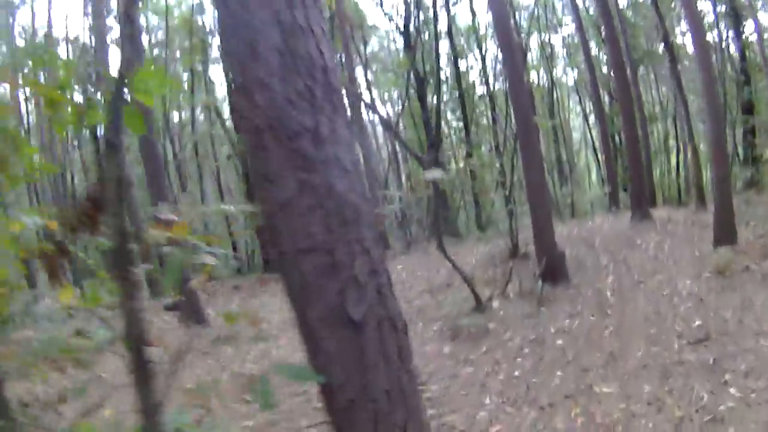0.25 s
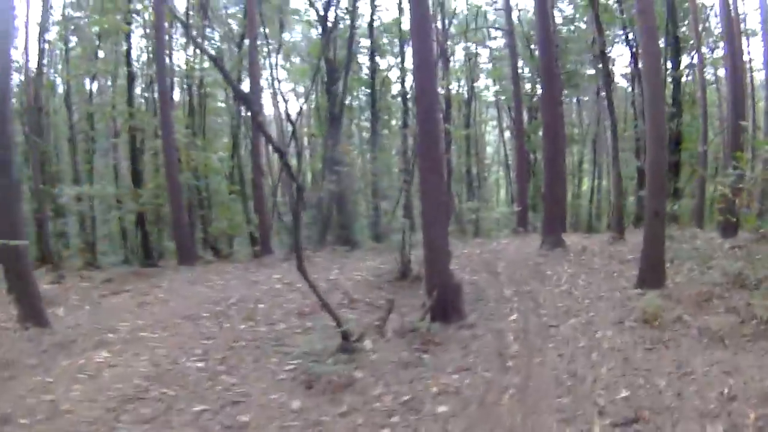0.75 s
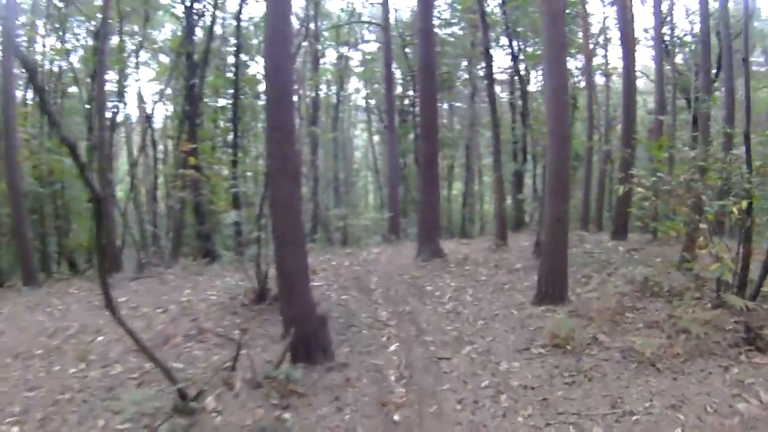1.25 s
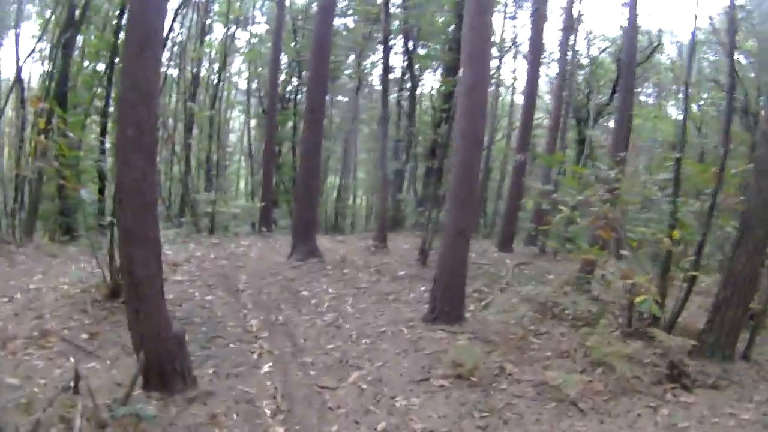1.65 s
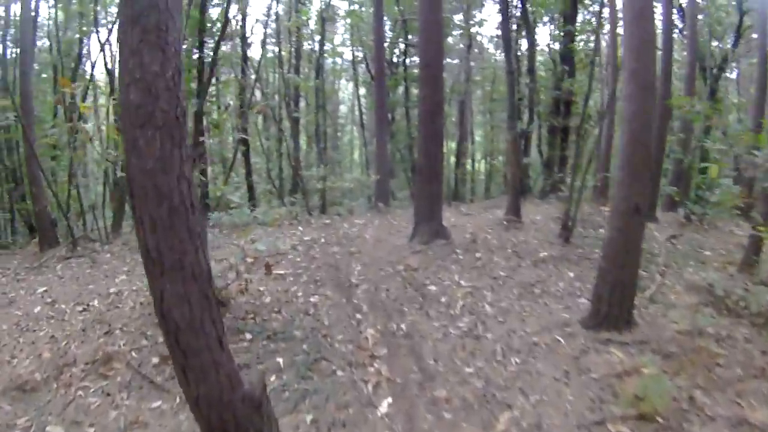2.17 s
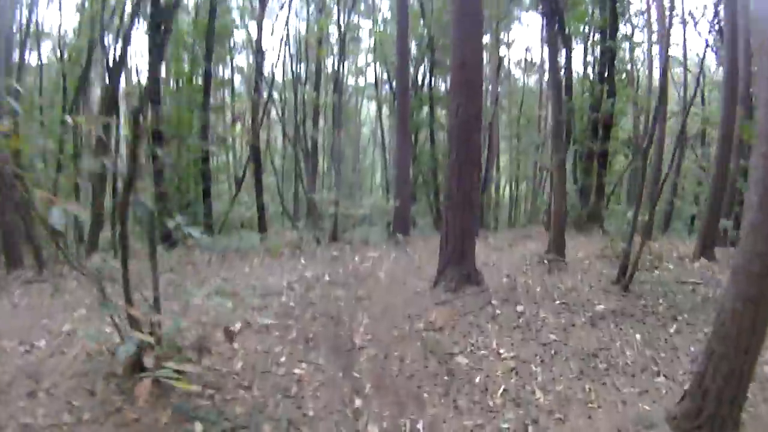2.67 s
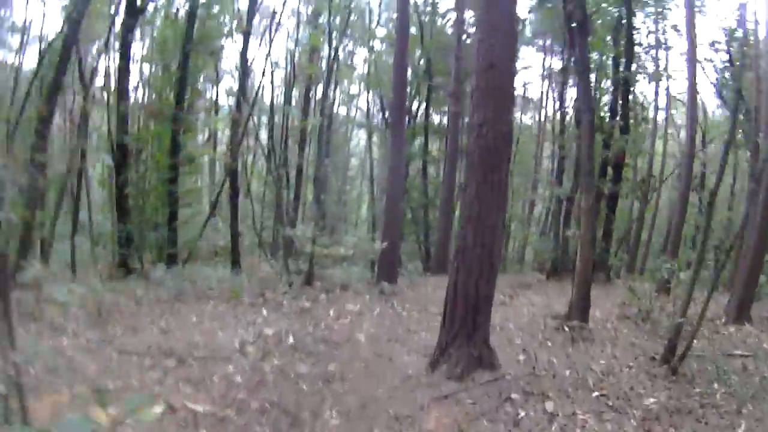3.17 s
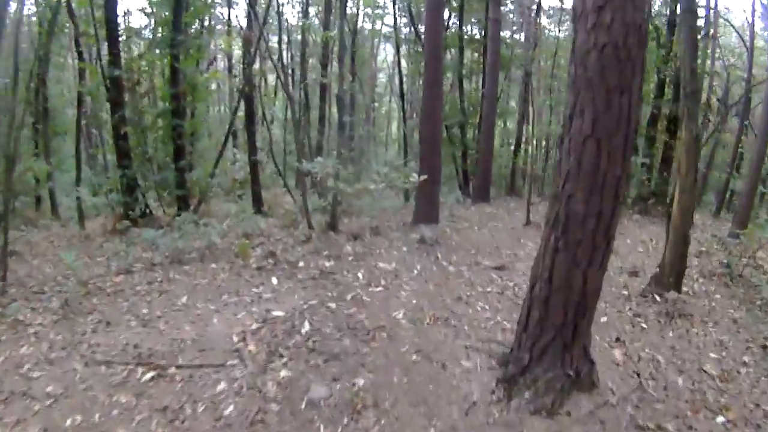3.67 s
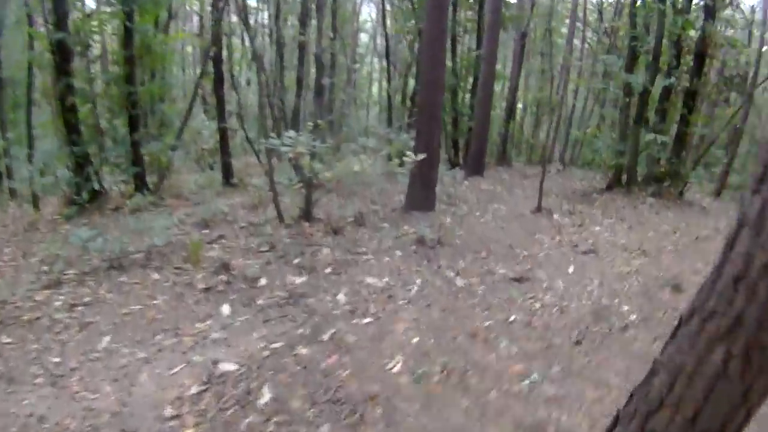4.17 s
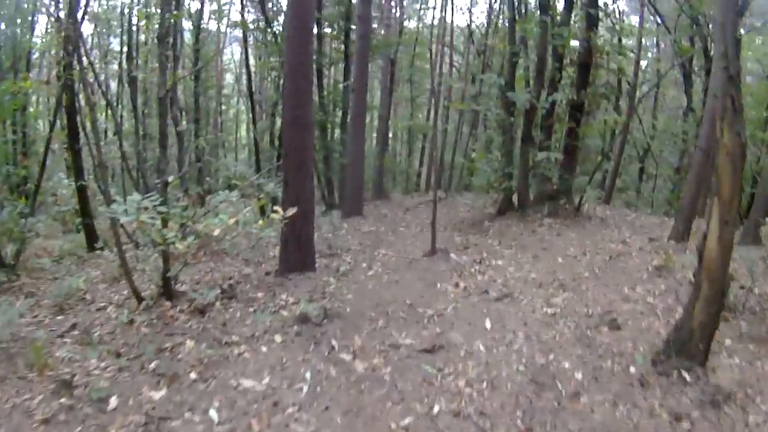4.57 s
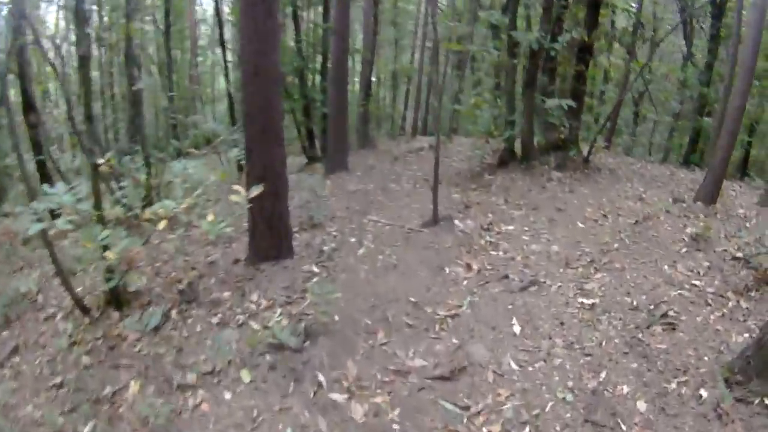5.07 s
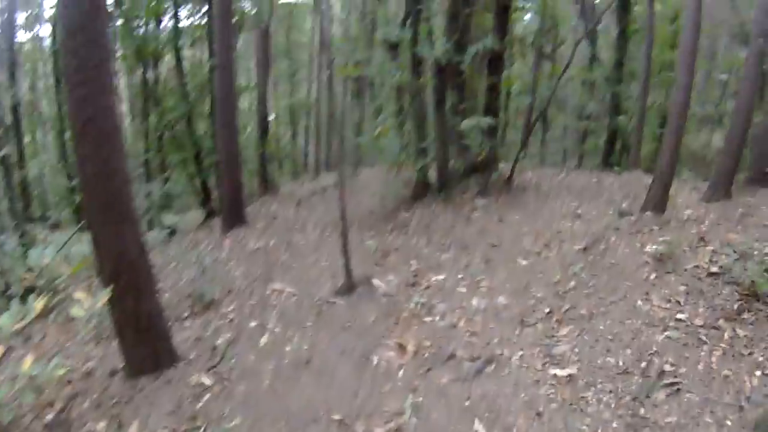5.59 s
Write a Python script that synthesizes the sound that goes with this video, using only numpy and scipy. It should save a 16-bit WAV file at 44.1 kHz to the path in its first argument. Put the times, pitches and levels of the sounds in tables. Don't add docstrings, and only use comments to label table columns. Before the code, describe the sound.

A bike rolls down a leafy forest trail, heard muffled inside a sealed helmet camera case, with low rumble, leaf crunch, ticks and snapping twigs.

```python
import sys
import numpy as np
from scipy import signal
from scipy.fft import rfft, irfft
from scipy.io import wavfile
from scipy.ndimage import uniform_filter1d

SR = 44100
rng = np.random.default_rng(int(sys.argv[2]) if len(sys.argv) > 2 else 0)


def transcribe(signal):
    frames = np.atleast_2d(signal).T
    limited = np.clip(frames, -1, 1)
    pcm = np.round(limited * 32767).astype(np.int16)
    wavfile.write(sys.argv[1], SR, pcm)


def volts_from_decibels(level):
    exponent = np.asarray(level, float) / 20
    return 10 ** exponent


N = 257358
TIME = np.arange(N) / SR

# (time [s], shaking [dB], leaf litter [dB], dryness of the leaves [dB])
TRAIL = [(0, -37.5, -57.5, -1), (.35, -23.5, -60.5, -0.5), (.62, -37.5, -63, -3.5), (.95, -31.5, -60, 1),
         (1.28, -37.5, -64, -3.5), (1.6, -47, -60.5, -2), (1.82, -34, -62, -7), (2.05, -40.5, -66.5, 0.5),
         (2.4, -36.5, -63, 2.5), (2.8, -32.5, -59.5, 4), (3.15, -36, -57.5, 7), (3.5, -33.5, -62.5, -2),
         (3.74, -41, -66, -2.5), (4.2, -36, -62.5, 3.5), (4.7, -32.5, -64, 2.5), (5.05, -40, -62, -2),
         (5.44, -30, -62, -6.5), (5.84, -27.5, -59, 0)]
# (time [s], extra shaking [dB], extra crush [dB], length [s])
JOLTS = [(0.097, 16.5, 4.5, 0.03), (0.28, 5.5, 3.5, 0.021), (.2, -2.5, 2, 0.026), (0.476, 3, 6.5, 0.11),
         (0.527, 5, -1.5, 0.038), (0.705, 13.5, 6.5, .05), (2.08, -8, -2, .04), (2.207, 1, 2, 0.055),
         (2.55, -8, 1, .04), (2.325, 10.5, 5, 0.038), (2.945, 8.5, 1, 0.065), (3.091, 12.5, 4, 0.061),
         (3.33, 5, 0.5, 0.041), (3.6, 8, 0, 0.029), (3.819, 13.5, 10, 0.042), (3.894, 2, 5.5, 0.026),
         (3.973, 21, 5, 0.053), (4.082, 8, 3, 0.034), (4.266, -13, 7, 0.016), (4.344, 10.5, -1, 0.031),
         (4.467, 11, 6.5, 0.057), (4.547, -0.5, 4.5, 0.015), (4.85, 1, 3.5, 0.024), (4.914, 9.5, 3, 0.048),
         (5.136, 9.5, 10, 0.027), (5.198, 10, 12.5, 0.024), (5.267, 12.5, 13, .04),
         (5.556, 5.5, 5.5, 0.037), (5.672, 4.5, 9.5, 0.018), (5.727, 10, 5, 0.034)]
# (frequency [Hz], level [dB])
HEAVE_COLOUR = [(1, -22.5), (3, 14.5), (16, 12), (24, 9.5), (32, -13), (45, -63), (300, -110)]
# (frequency [Hz], level [dB])
FLUTTER_COLOUR = [(18, -26), (28, 2), (40, -4.5), (54, -12.5), (80, -19.5), (108, -31), (150, -53),
                  (300, -100)]
# (frequency [Hz], level [dB])
DRONE_COLOUR = [(70, -10), (110, -3), (155, -5.5), (235, -1.5), (270, -6), (480, -13), (900, -21),
                (1600, -50)]
# (frequency [Hz], level [dB])
LEAF_COLOUR = [(400, -1), (700, -15.5), (1300, -2), (2000, -10.5), (3000, -7), (4500, -10.5), (5600, -25),
               (7000, -37), (10000, -73)]
# (frequency [Hz], width [Hz], level [dB])
CASE_RESONANCES = [(897, 253, -5.5), (1850, 213, -1.5), (2136, 190, -4), (2683, 185, 0.5), (3360, 560, -8),
                   (4250, 560, -13), (4440, 210, -21), (5100, 230, -20.5)]
# (time [s], peak [dB], ring [Hz], decay [s], knock [dB])
BUMPS = [(.044, -36, 65, 0.16, -7), (.12, -51, 67, .1, 12), (.21, -54.5, 67, .1, 8), (.46, -53, 67, .1, 6),
         (2.8, -56, 67, .1, 9), (.686, -40, 64.6, 0.14, -21), (1.354, -43, 93, 0.09, -1.5),
         (1.419, -31, 70, 0.21, -12.5), (1.661, -33.5, 72.6, 0.2, -6.5), (2.929, -45, 62, 0.25, -13),
         (3.84, -44, 68.5, 0.29, 3.5), (5.198, -44, 70, 0.096, 14), (5.31, -31.5, 70, 0.23, -18),
         (5.552, -29, 55, 0.22, -13), (5.74, -29, 48, 0.15, -15)]
# (time [s], peak [dB], lower ring [dB])
TICKS = [(0.2683, -45, -11), (0.427, -44, -13), (0.545, -46, -6), (0.6699, -44.5, -9), (0.8057, -46.5, -9),
         (1.038, -54, -11), (1.35, -44.5, -10.5), (1.6082, -62, -8), (1.6482, -46.5, -8),
         (1.9485, -47.5, -9), (2.1543, -55, -6), (2.2009, -54, -6), (2.428, -45.5, -13), (2.674, -44, -7),
         (2.8903, -43, -5), (3.2064, -43.5, -14), (3.3987, -45.5, -5), (3.5557, -44.5, -13),
         (3.9532, -44.5, -8), (4.0934, -55.5, -6), (4.4483, -44, -9), (4.5416, -54, -3),
         (4.9586, -43.5, -13), (5.1288, -48, -4), (5.2574, -44.5, -4), (5.5054, -43.5, -12),
         (5.6305, -44.5, -10), (5.8152, -43.5, -14)]
# (time [s], peak [dB], colour [Hz])
TWIGS = [(0.886, -52, 2660), (1.192, -52, 2070), (1.4136, -50, 1900), (1.4694, -43, 2500),
         (1.5702, -44.5, 1190), (1.6577, -41.5, 2780), (1.728, -53, 2720), (1.7649, -51.5, 2640),
         (2.154, -50, 2580), (2.3156, -52, 2600), (2.5145, -48.5, 2490), (2.7857, -45, 2820),
         (2.859, -44.5, 1950), (3.0975, -40.5, 1850), (3.243, -52, 2400), (3.276, -40.5, 2820),
         (3.2964, -59, 2810), (3.3293, -42, 1600), (3.351, -43.5, 2610), (3.9683, -47, 3000),
         (4.2484, -53, 2750), (4.3045, -43.5, 2630), (4.542, -52, 2660), (4.749, -50, 2780),
         (5.1861, -43.5, 2730), (5.257, -51.5, 2700), (5.5225, -48.5, 2740), (5.572, -51, 1960),
         (5.677, -46, 1850), (5.7355, -45, 1840)]
# (time [s], peak [dB])
WHIP = [
    (3.053, -48),
    (3.055, -23),
    (3.062, -37.5),
    (3.07, -55),
    (3.077, -64),
]
# (frequency [Hz], level [dB], decay [s])
WHIP_RING = [(940, -26, 0.045), (1510, -22.5, 0.025), (1750, -12.5, 0.025), (2130, -5, 0.017),
             (2700, 2, 0.02), (3240, -5, 0.013), (4160, -10.5, 0.019), (4600, -13.5, 0.018),
             (4920, -20, .014), (5440, -16, 0.021), (6360, -22, 0.019), (6920, -27, 0.025),
             (8500, -28, 0.012), (9600, -36, 0.012)]
# (time [s], pressure at the peak [full scale], rise [s], fall [s])
LANDINGS = [
    (5.191, -0.21, 0.046, 0.0066),
    (5.2012, 0.89, 0.0088, 0.0079),
    (5.552, -0.12, 0.022, 0.021),
    (5.749, 0.064, 0.016, 0.016),
]
# (frequency [Hz], level [dB])
HISS_COLOUR = [(35, -33.5), (60, 12), (130, -14), (500, -17), (2600, -19.5), (4810, -16), (10000, -17),
               (15800, -18.5)]


def colour(x, points):
    hz, db = np.transpose(points)
    f = np.maximum(np.arange(N // 2 + 1) * SR / N, 0.1)
    gain = volts_from_decibels(np.interp(np.log(f), np.log(hz), db))
    return irfft(rfft(x) * gain, N)


def unit(x):
    return x / np.sqrt(np.mean(x ** 2))


def steady(x, length_s, slack):
    return x / np.sqrt(uniform_filter1d(x ** 2, int(SR * length_s)) + slack)


def walk(rate):
    hold = int(SR / rate)
    steps = np.repeat(rng.standard_normal(N // hold + 1), hold)
    for _ in range(2):
        steps = uniform_filter1d(steps, hold, mode="wrap")
    return unit(steps[:N])


def resonance(x, hz, width_hz):
    return signal.lfilter(*signal.iirpeak(hz, hz / width_hz, SR), x)


def ring(hz, t60, onset):
    t = TIME[:int(SR * t60)]
    swell = 1 - np.exp(-t / onset)
    return np.sin(2 * np.pi * hz * t) * np.exp(-np.log(1000) * t / t60) * swell


def add(out, s, sound):
    i = int(s * SR)
    out[i:i + len(sound)] += sound[:len(out) - i]


def case(x):
    out = 0
    for k, (hz, width_hz, db) in enumerate(CASE_RESONANCES):
        out = out + (-1) ** k * volts_from_decibels(db) * resonance(x, hz, width_hz)
    return out


def crackle(per_s, spread_db, patchy_db):
    chance, luck, side = rng.random((3, N))
    size_db = spread_db * np.minimum(-np.log(1 - luck), 5.5)
    patches_db = 0.5 * patchy_db * walk(14) + 1.5 * patchy_db * walk(50)
    return unit((chance < per_s / SR) * np.sign(side - 0.5) * volts_from_decibels(size_db + patches_db))


def rumble(heave_db, flutter_db, drone_db):
    heave = unit(colour(rng.standard_normal(N), HEAVE_COLOUR))
    flutter = unit(colour(crackle(300, spread_db=4.0, patchy_db=2.0), FLUTTER_COLOUR))
    drone = unit(colour(crackle(1500, spread_db=2.5, patchy_db=0.5), DRONE_COLOUR))
    return (volts_from_decibels(heave_db) * steady(heave, 0.167, 0.13)
            + volts_from_decibels(flutter_db) * steady(flutter, 0.34, 0.18)
            + volts_from_decibels(drone_db) * steady(drone, 0.15, 0.25))


def leaves(crunch_db, bright_db):
    through_walls = unit(case(crackle(5000, spread_db=2.5, patchy_db=1.5)))
    leak = unit(colour(crackle(6000, spread_db=3.0, patchy_db=-2.5), LEAF_COLOUR))
    crunch = through_walls + volts_from_decibels(-4.0) * leak
    top = resonance(crunch, 4800, 3030)
    return volts_from_decibels(crunch_db - 4.5) * (crunch + (volts_from_decibels(bright_db) - 1) * top)


def ride():
    s, *columns = np.transpose(TRAIL)
    shake_db, litter_db, dry_db = (uniform_filter1d(np.interp(TIME, s, c), SR // 20) for c in columns)
    swells = np.array([np.exp(-((TIME - s) / length) ** 2) for s, _, _, length in JOLTS])
    jolt_db, crush_db = np.transpose(JOLTS)[1:3] @ swells
    leaf_db = litter_db + crush_db

    def follow(db, per_shake, per_jolt, per_leaf):
        return db + per_shake * (shake_db + 36.5) + per_jolt * jolt_db + per_leaf * (leaf_db + 64.5)

    flutter_db = follow(-50, per_shake=0.67, per_jolt=0.9766, per_leaf=0.05)
    drone_db = follow(-62, per_shake=0.18, per_jolt=0.1834, per_leaf=0.27)
    bright_db = dry_db + 0.39 * crush_db
    return rumble(shake_db + jolt_db, flutter_db, drone_db) + leaves(leaf_db, bright_db)


def bumps():
    out = np.zeros(N)
    for s, db, hz, t60, knock_db in BUMPS:
        add(out, s, volts_from_decibels(db) * ring(hz, t60, 0.00067))
        add(out, s - 0.004, -volts_from_decibels(db + knock_db) * ring(231, 0.049, 0.00061))
        add(out, s - 0.004, -volts_from_decibels(db + knock_db - 9.5) * ring(335, 0.028, 0.0015))
    return out


def ticks():
    out = np.zeros(N)
    for (s, db, low_db), (a, b, c) in zip(TICKS, rng.standard_normal((len(TICKS), 3))):
        hz = 4203 + 30 * c
        add(out, s, volts_from_decibels(db + 3.5) * ring(hz, 0.012, 0.00044))
        add(out, s + 0.00034, volts_from_decibels(db - 3.0) * ring(4720 + 100 * a, 0.014, 0.00036))
        add(out, s + 0.00033, -volts_from_decibels(db - 12.5) * ring(5200, 0.016, 0.00028))
        high = ring(6100 + 200 * a, 0.009, 0.0003) + ring(6900 + 300 * b, 0.009, 0.0003)
        add(out, s + 0.0008, volts_from_decibels(db - 16) * high)
        add(out, s + 0.00144, volts_from_decibels(db + low_db + 3.0) * ring(3200 + 150 * b, 0.023, 0.00027))
        add(out, s + 0.00299, volts_from_decibels(db + low_db + 2.5) * ring(1950 + 200 * c, 0.015, 0.00065))
        add(out, s + 0.014 + 0.0027 * a, volts_from_decibels(db - 15.0) * ring(hz, 0.015, 0.00071))
    return out


def twigs():
    out = np.zeros(N)
    t = TIME[:SR // 16]
    for (s, db, hz), noise in zip(TWIGS, rng.standard_normal((len(TWIGS), len(t)))):
        splinters = noise ** 3 * np.exp(-t / 0.0051)
        snap = 0.39 * case(splinters) + resonance(splinters, hz, 420)
        softened = resonance(resonance(snap, 2500, 6500), 2500, 6500)
        add(out, s, volts_from_decibels(db + 1.0) * softened / np.abs(snap).max())
    return out


def whip():
    out = np.zeros(N)
    for (s, db), turn in zip(WHIP, rng.random((len(WHIP), len(WHIP_RING), 2))):
        for (hz, mode_db, t60), (late, bend) in zip(WHIP_RING, turn):
            bent_hz = hz * (1 + 0.064 * (bend - 0.5))
            add(out, s + late / hz, volts_from_decibels(db + mode_db + 2.0) * ring(bent_hz, t60, 0.00021))
    strike_s = WHIP[1][0]
    scrape = rng.standard_normal(SR // 5) ** 3 / 4 * np.exp(-TIME[:SR // 5] / 0.018)
    bright = resonance(resonance(scrape, 4300, 3500), 4300, 3500)
    add(out, strike_s, volts_from_decibels(-39.5) * case(scrape) + volts_from_decibels(-43.5) * bright)
    first_touch = scrape[:600] * np.exp(-TIME[:600] / 0.0035)
    add(out, strike_s, volts_from_decibels(-52) * resonance(first_touch, 7000, 7000))
    return out


def landings():
    air = np.zeros(N)
    for s, pressure, rise, fall in LANDINGS:
        phase = np.clip((TIME - s) / np.where(TIME < s, rise, fall), -1, 1)
        air += pressure * np.cos(np.pi / 2 * phase) ** 2
    add(air, 5.2065, -volts_from_decibels(-12) * ring(70, 0.21, 0.0022))
    seal_hz = 91
    return colour(air, [(seal_hz, 0), (2.0 * seal_hz, -25), (6 * seal_hz, -50)])


def scene():
    sound = ride() + bumps() + ticks() + twigs() + whip() + landings()
    return np.array([sound, sound])


def roll_off(x):
    return signal.sosfilt(signal.butter(12, 15930, fs=SR, output="sos"), x)


def record(dry):
    hiss = np.array([unit(colour(rng.standard_normal(N), HISS_COLOUR)) for _ in dry])
    channel_gain = volts_from_decibels(np.array([[0.04], [-0.04]]))
    wet = dry * channel_gain + volts_from_decibels(-67) * hiss - 0.0014
    top_cut = signal.ellip(10, 0.2, 60, 15740, fs=SR, output="sos")
    return roll_off(signal.sosfilt(top_cut, wet))


dry = scene()
out = record(dry)
transcribe(out)
```